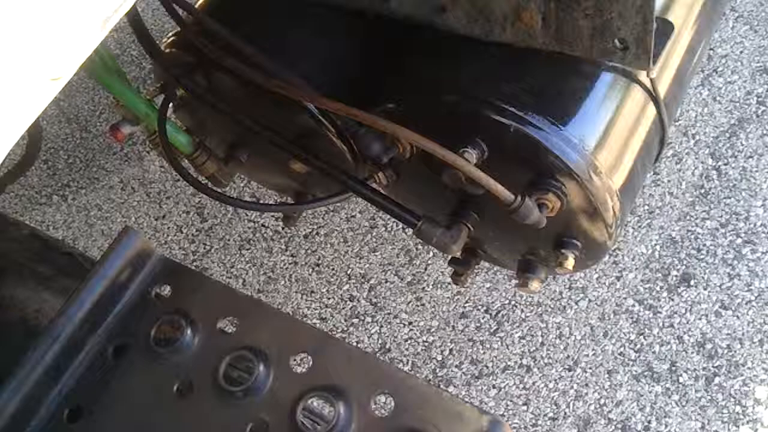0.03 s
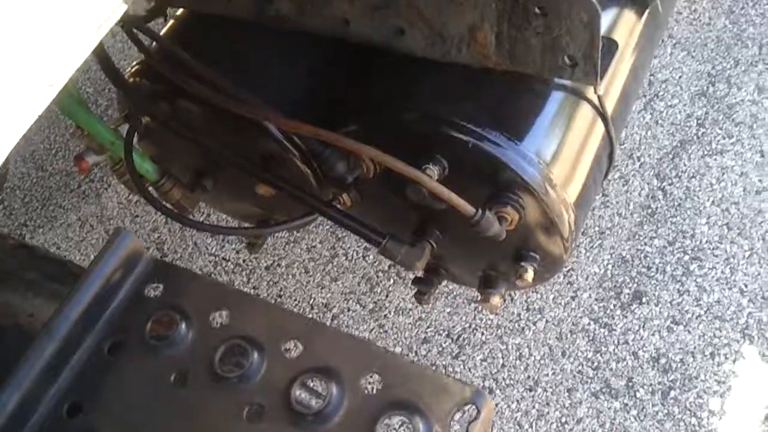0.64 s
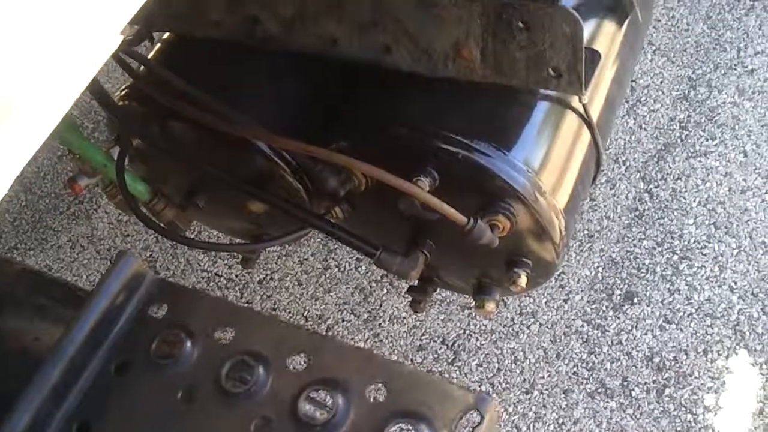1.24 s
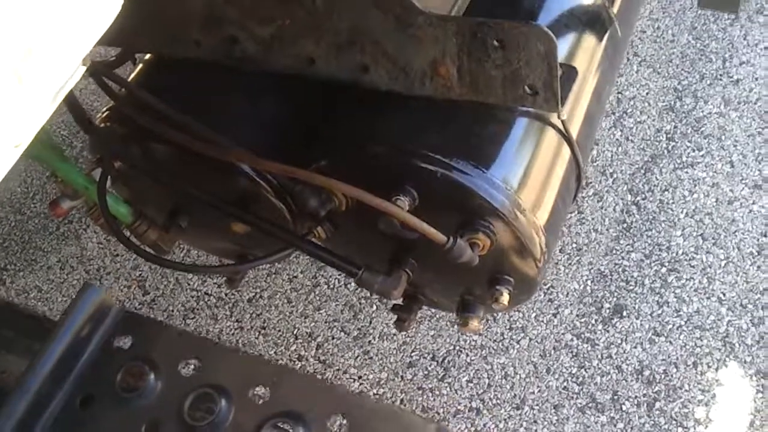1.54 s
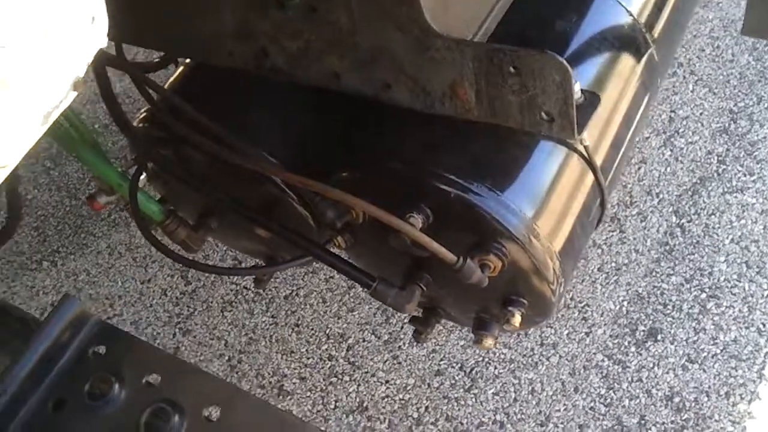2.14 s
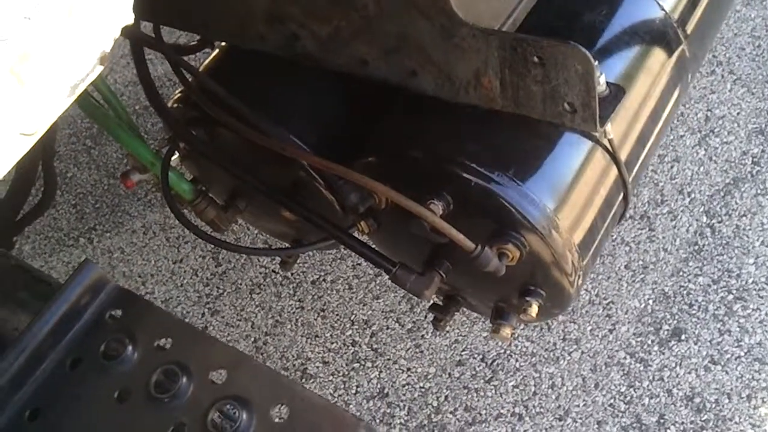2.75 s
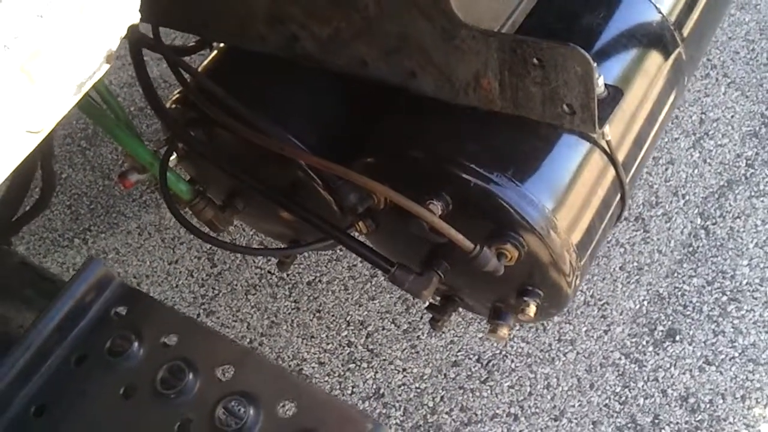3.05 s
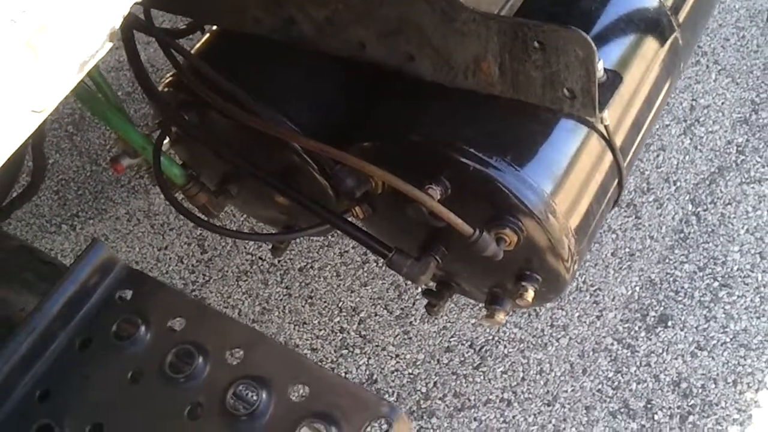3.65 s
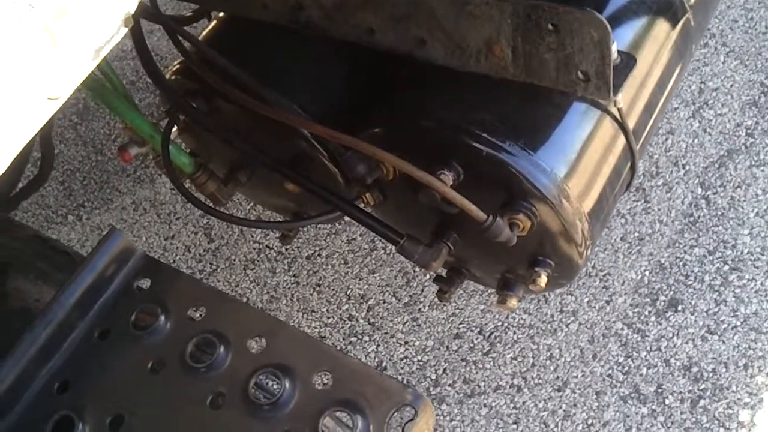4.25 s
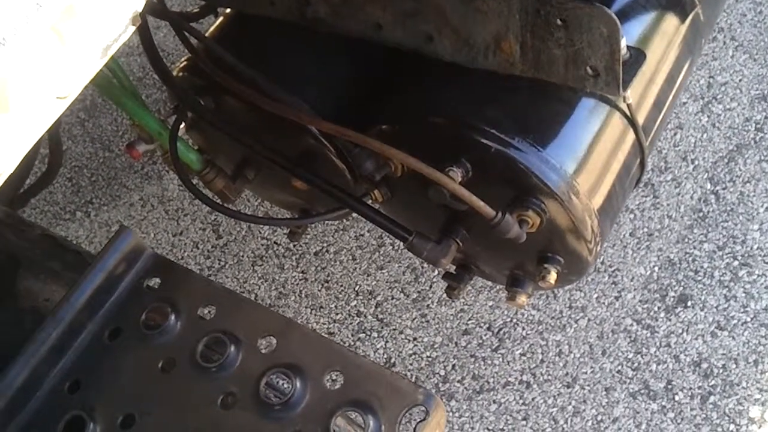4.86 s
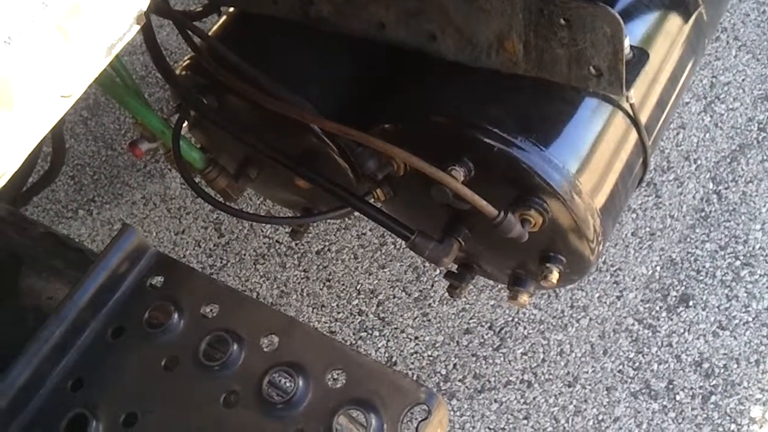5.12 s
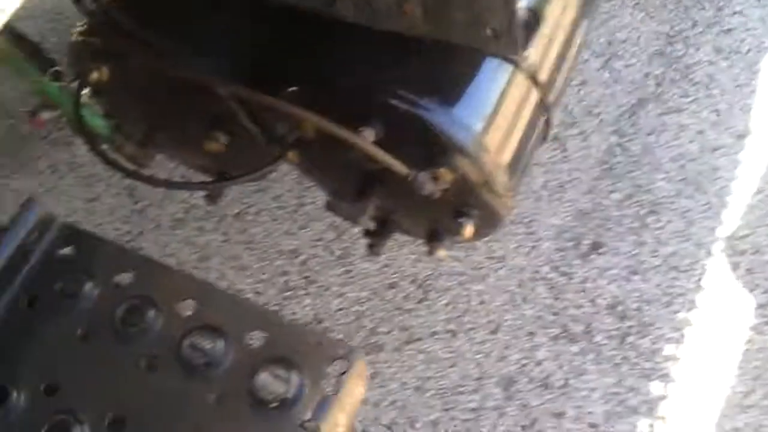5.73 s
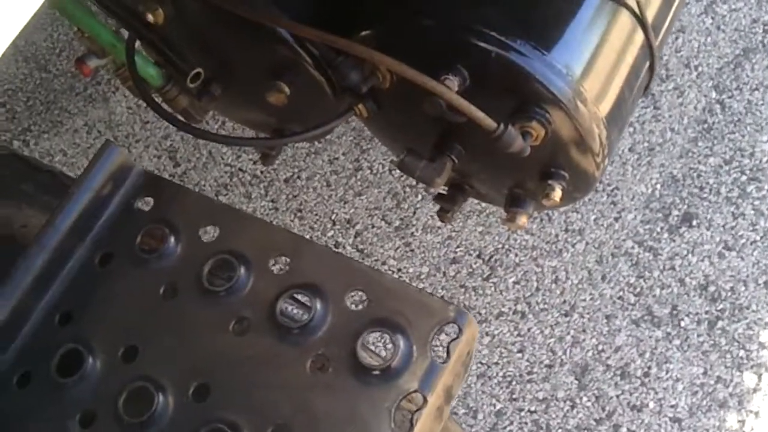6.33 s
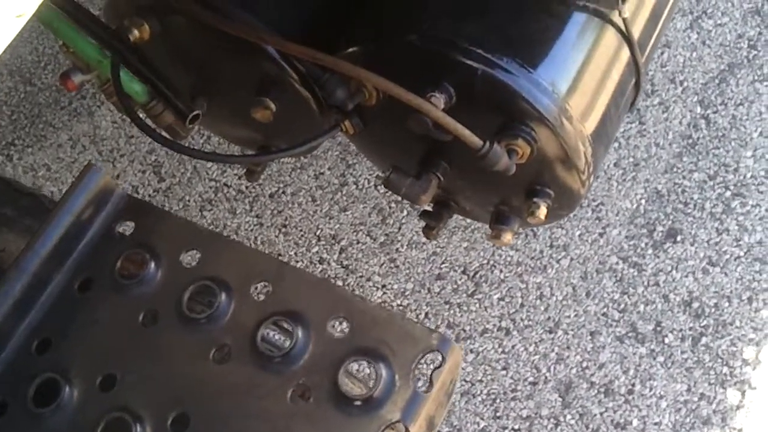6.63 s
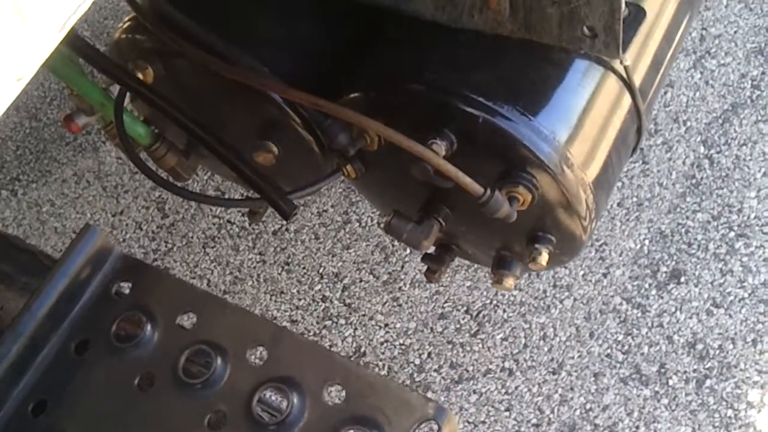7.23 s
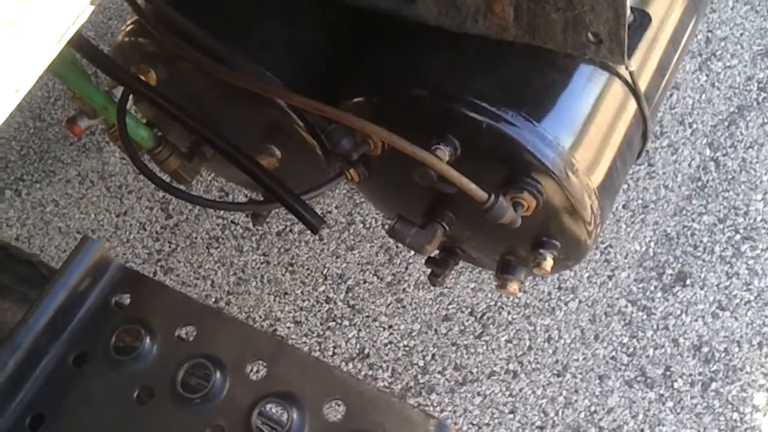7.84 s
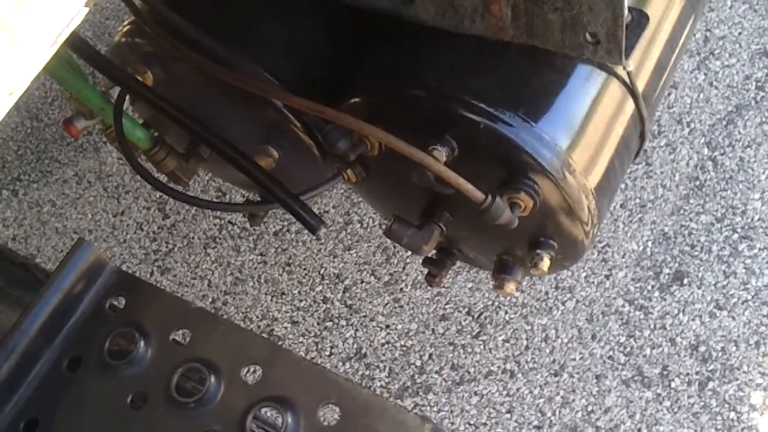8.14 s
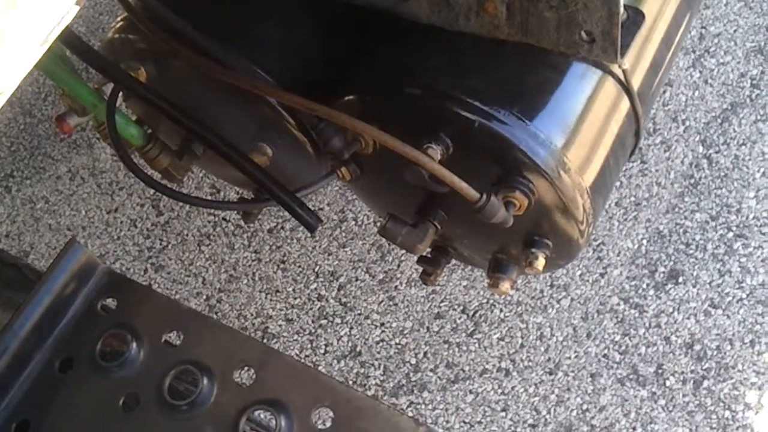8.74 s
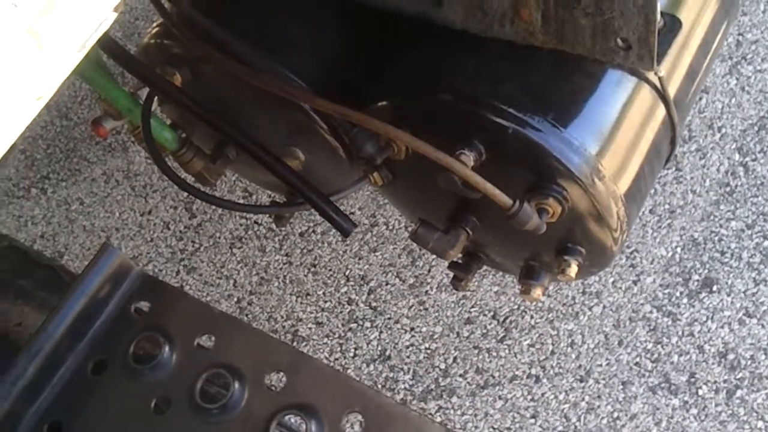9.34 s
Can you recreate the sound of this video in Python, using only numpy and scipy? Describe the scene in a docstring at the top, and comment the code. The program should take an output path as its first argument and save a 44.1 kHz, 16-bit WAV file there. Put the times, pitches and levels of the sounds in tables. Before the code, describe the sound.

Heard on a small recorder close to a truck's air tanks, the diesel engine knocks and drones evenly at idle. Suddenly a hose kicks and a loud, squeezed rush of compressed air takes over, with shifting whistling tones and a draught buffeting the microphone. The air line starts a throbbing hum that grows louder and buzzier, while the jet loses some brightness and strength near the end.

```python
"""Beside an idling six-cylinder diesel truck, one microphone close to the air tanks. The small recorder
fades in on the knock and drone of the engine. At 5.6 s a valve opens: the open hose kicks and compressed
air bursts out, a broad hiss that buffets the microphone and is squeezed by the recorder's fast limiter.
The hose's whistling resonances shift as the pressure falls. From about 7 s the air line hums, louder and
louder, and after 8.3 s the jet starts to give out."""
import sys
import numpy as np
from scipy import signal
from scipy.fft import rfft, irfft, next_fast_len
from scipy.io import wavfile
from scipy.ndimage import map_coordinates

SR = 44100
rng = np.random.default_rng(int(sys.argv[2]) if len(sys.argv) > 2 else 0)


def dump_mix(stems):
    """Bounce the given channels to the path in sys.argv[1] as a 16-bit WAV at rate SR."""
    frames = np.atleast_2d(stems).T  # one column per channel
    limited = np.clip(frames, -1, 1)  # hard clip at full scale
    pcm = np.round(limited * 32767).astype(np.int16)
    wavfile.write(sys.argv[1], SR, pcm)


N = 413658
TIME = np.arange(N) / SR


def amp(db):
    """Decibels to gain."""
    return 10 ** (np.asarray(db) / 20)


def unit(x):
    """Scale to rms 1."""
    return x / np.sqrt(np.mean(x ** 2) + 1e-20)


def gain_at(points, hz):
    """Gain at hz from (Hz, dB) points joined on a log frequency axis."""
    f, db = np.transpose(points)
    return amp(np.interp(np.log(hz + 1), np.log(f + 1), db))


def wobble(rate):
    """A smooth random curve, rate knots a second."""
    return map_coordinates(rng.standard_normal(int(N * rate / SR) + 4), [TIME * rate])


def filtered(x, response):
    """Pass x through a frequency response."""
    size = next_fast_len(N + SR // 2)
    return irfft(rfft(x, size) * response(np.fft.rfftfreq(size, 1 / SR)), size)[:N]


def noise(response):
    """Coloured noise of rms 1."""
    return unit(filtered(rng.standard_normal(N), response))


def resonance(f, hz, width):
    """Causal response of one mode, 1 at its centre."""
    return 1j * f * width / (hz * hz - f * f + 1j * f * width)


def crank(cycle_hz=5.835, drift=0.0034):
    """Engine cycles gone by, two crankshaft turns each; the governor lets the speed wander a little."""
    return cycle_hz * TIME + drift * wobble(2)


# The six firings. Each row: place in the engine cycle from 0 to 1, relative knock level in dB.
FIRINGS = [(.095, 4), (.265, 1.5), (.425, 4.5), (.595, 0), (.765, 1.5), (.915, -3.5)]
# Block and chassis, heard from the tanks. Each row: frequency in Hz, relative level in dB.
BLOCK_SPECTRUM = [(25, -32.5), (100, -15), (190, -9.5), (330, -9), (560, -7), (780, -1), (1400, -1),
                  (2500, -2.5), (3300, -8), (4200, -11.5), (5000, -17.5), (6300, -20), (8000, -26.5)]
# Ringing castings and panels. Each row: frequency in Hz, width in Hz, lift in dB.
PANEL_MODES = [(417, 33, 6.5), (562.5, 26, 7), (698, 12, 2.5), (763, 36, 4), (1032, 60, 3), (1338, 35, 4),
               (1437, 36, 3.5), (2006, 37, 6), (2140, 38, 6.5), (2660, 64, 2), (3060, 31, 4),
               (4130, 120, 4), (4640, 22, 5.5), (6200, 150, 3)]

def clatter(cycle, knock_s=0.0097, scatter_db=1.5, wash_db=-3, tick_db=0.5, level_db=-10.5):
    """Each firing shakes the block with a burst of noise, over a wash of gears and fan."""
    def block(f):
        ringing = sum((amp(db) - 1) * resonance(f, hz, width) for hz, width, db in PANEL_MODES)
        return gain_at(BLOCK_SPECTRUM, f) * (1 + ringing)

    blows = np.zeros(N)
    for place, db in FIRINGS:
        at = np.flatnonzero(np.diff(np.floor(cycle - place)) > 0)
        blows[at] = amp(db + scatter_db * rng.standard_normal(64)[:len(at)]) ** 2
    t = TIME[:SR // 8]
    knock = np.exp(-t / knock_s) * (1 - np.exp(-t / 0.00084))
    power = np.abs(signal.fftconvolve(blows, knock)[:N]) + amp(wash_db) ** 2
    ticks = amp(tick_db * wobble(420))  # valve gear and injectors break up the noise
    force = np.sqrt(power) * ticks * rng.standard_normal(N)
    return amp(level_db) * unit(filtered(force, block))


# Low tones under the clatter. Each row: multiple of the cycle rate, mean level in dB.
ENGINE_TONES = [(6, -36.5), (7, -47), (12, -36), (17.25, -44.5), (18, -44.5), (30, -41), (34.5, -43.5),
                (36, -43), (43, -37), (119.2, -38.5), (127.7, -37.5), (211.1, -34), (246.8, -35)]

def drone(cycle, waver_db=3.5):
    """Exhaust, belt-driven parts and gears sound wavering tones locked to the crankshaft."""
    out = np.zeros(N)
    for order, db in ENGINE_TONES:
        level = np.sqrt(2) * amp(db + waver_db * wobble(5.1))
        out += level * np.sin(2 * np.pi * (order * cycle + rng.random()))
    return out


# Hose knocks. Each row: start in seconds, level in dB, ring in Hz, seconds to fall 60 dB.
HOSE_KICKS = [(5.608, -7, 420, .015), (5.684, -2.5, 240, .09), (5.708, 6.5, 510, 0.055),
              (5.7165, 10.5, 715, 0.046)]

def hose_kicks(ring=0.73, low_hz=130, puff_over_ring=1.2):
    """The hose jerks under the sudden pressure: each knock is a dull puff with a short ring."""
    out = np.zeros(N)
    for start, db, hz, t60 in HOSE_KICKS:
        t = np.maximum(TIME - start, 0)
        puff = noise(lambda f: (f > low_hz) / (1 + (f / (puff_over_ring * hz)) ** 4))
        envelope = amp(db - 60 * t / t60) * (1 - np.exp(-t / 0.00059))
        out += envelope * (puff + ring * np.sin(2 * np.pi * hz * t))
    return out


# The jet at close range. Each row: frequency in Hz, relative level in dB.
HISS_SPECTRUM = [(60, -17), (250, -6), (900, -9), (1600, -3.5), (2100, 1.5), (3000, -0.5), (4400, -0.5),
                 (5400, -3), (7500, -3), (8500, -4.5)]

def hiss(age, spent, split_hz=4500, build_s=0.12, flutter_db=1.0):
    """The jet brightens as the valve opens wide, sags slowly, then dulls as the tank empties."""
    rush = noise(lambda f: gain_at(HISS_SPECTRUM, f))
    body = filtered(rush, lambda f: 1 / (1 + (f / split_hz) ** 4))
    treble = rush - body
    body_gain = amp(0.9 - 1.5 * age - 2.5 * spent)  # slopes in dB a second
    treble_gain = amp(0.5 - 11 * spent) * (1 - 0.49 * np.exp(-age / build_s))
    return amp(flutter_db * wobble(25)) * (body_gain * body + treble_gain * treble)


# Wind on the microphone. Each row: frequency in Hz, relative level in dB.
BUFFET_SPECTRUM = [(15, -6), (35, 5.5), (80, 3), (160, -9), (400, -30), (1500, -63)]

def buffet(spent, level_db=-23, fade_db_per_s=24.5, gust_db=3.4):
    """The draught rumbles on the microphone until the pressure gives out."""
    level = amp(level_db - fade_db_per_s * spent + gust_db * wobble(12))
    return level * noise(lambda f: gain_at(BUFFET_SPECTRUM, f))


# Hose resonances. Each row: frequency in Hz, nominal width in Hz, level at the peak in dB,
# time of the peak in seconds, spread in seconds.
HOSE_MODES = [(2070, 350, -7.5, 5.87, 0.44), (3355, 83, -15, 6.1, 0.22), (4280, 180, -11.5, 6.65, 0.66),
              (6170, 85, -15.5, 7.8, 0.39), (6730, 350, -14.5, 7.5, 0.63), (2308, 174, -9, 8.46, 0.58),
              (2736, 160, -9.5, 8.18, 0.88), (3074, 144, -8, 8.83, 1), (7520, 480, -12.5, 8.57, 0.24),
              (1943, 80, -12, 9.08, 0.28)]

def whistles(flutter_db=0.73):
    """Each hose resonance swells and fades as the falling pressure passes through its range."""
    out = np.zeros(N)
    for hz, width, db, peak_s, spread_s in HOSE_MODES:
        swell = np.exp(-.5 * ((TIME - peak_s) / spread_s) ** 2)
        level = swell * amp(db + flutter_db * wobble(40))
        out += level * noise(lambda f: resonance(f, hz, 1.8 * width) ** 2)
    return out


def air_blast(open_s=5.609, spent_s=8.28, attack_s=0.0087):
    """The valve opens and air leaves the hose; from spent_s the tank's pressure gives out."""
    age = np.maximum(TIME - open_s, 0)
    spent = np.maximum(TIME - spent_s, 0)
    jet = hiss(age, spent) + whistles() + buffet(spent)
    return jet * np.minimum(age / attack_s, 1)


# The hum's weaker partials. Each row: harmonic number, final level in dB against the second harmonic.
HUM_PARTIALS = [(1, -21.5), (3, -10.5), (4, -13)]

def line_hum(cycle, start_s=7.15, attack_s=0.07, settle_s=0.6, final_hz=144.4, flat_hz=18.5,
             start_db=-20, swell_db_per_s=7, buzz_growth=0.42, shake=0.24):
    """The air line vibrates in the flow: flat and unsteady at first, buzzier as it grows."""
    age = np.maximum(TIME - start_s, 0)
    unsettled = np.exp(-age / settle_s)
    jitter = (.007 + .022 * unsettled) * wobble(30)
    pitch_hz = (final_hz - flat_hz * unsettled) * (1 + jitter)
    phase = 2 * np.pi * np.cumsum(pitch_hz) / SR
    level_db = start_db + swell_db_per_s * age
    buzz = amp(buzz_growth * (level_db - level_db.max()))
    partials = sum(amp(db) * np.sin(k * phase + rng.uniform(0, 2 * np.pi)) for k, db in HUM_PARTIALS)
    tone = np.sqrt(2) * (np.sin(2 * phase) + buzz * partials)  # the second harmonic carries the sound
    throb = 1 + shake * np.sin(2 * np.pi * len(FIRINGS) * cycle)  # each firing shakes the line
    waver_db = (0.5 + 2.5 * unsettled) * wobble(20)
    return tone * throb * amp(level_db + waver_db) * np.minimum(age / attack_s, 1)


def scene():
    """Engine and escaping air at one microphone close to the tanks."""
    cycle = crank()
    return (clatter(cycle) + drone(cycle) + air_blast() + line_hum(cycle) + hose_kicks())[None]


def fade_in(start_s=0.776, length_s=0.25, first_db=-17.5, curve=1.2):
    """The recorder's gain: silence, a quick step to a low level, then a rise to full."""
    switch_on = np.clip((TIME - start_s) / .002, 0, 1)
    rise = np.clip((TIME - start_s) / length_s, 0, 1) ** curve
    return switch_on * (rise + amp(first_db) * (1 - rise))


def limiter(x, ceiling=.725):
    """Each half wave that would overshoot is scaled to the ceiling: loud air ducks the engine, fizzing."""
    starts = np.r_[0, np.flatnonzero(np.diff(x > 0)) + 1]
    peaks = np.maximum.reduceat(np.abs(x), starts)
    lengths = np.diff(np.r_[starts, N])
    return x / np.repeat(np.maximum(1, peaks / ceiling), lengths)


# The microphone, falling steeply above 8 kHz. Each row: frequency in Hz, gain in dB.
MICROPHONE_RESPONSE = [(7900, 0.5), (8300, -4), (8700, -13.5), (9200, -43.5), (10000, -95)]
# The recorder's tone after the limiter. Each row: frequency in Hz, gain in dB.
RECORDER_TONE = [(40, -9), (100, -6), (220, -0.5), (7800, -0.5), (9000, -6), (10500, -4.5), (13000, 0.5),
                 (15500, 1)]

def record(dry, top_hz=15800):
    """A narrow-band microphone feeds the small recorder: fade-in, fast limiter, tone and band limit."""
    picked_up = filtered(dry[0], lambda f: gain_at(MICROPHONE_RESPONSE, f))
    squeezed = limiter(picked_up * fade_in())
    return filtered(squeezed, lambda f: gain_at(RECORDER_TONE, f) * (f < top_hz))[None]


dry = scene()
out = record(dry)
dump_mix(out)
```